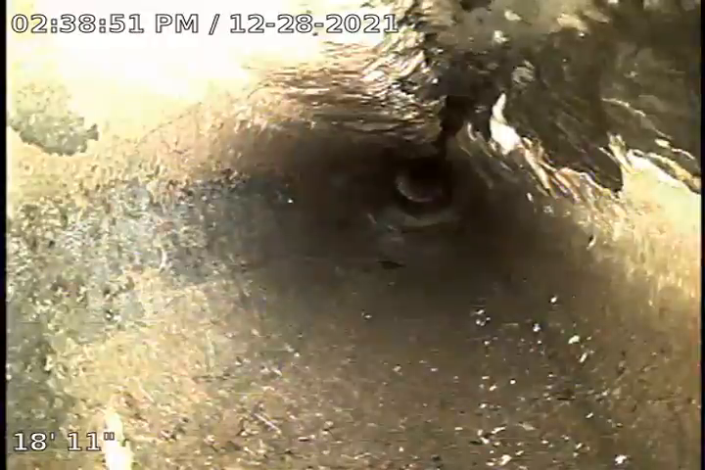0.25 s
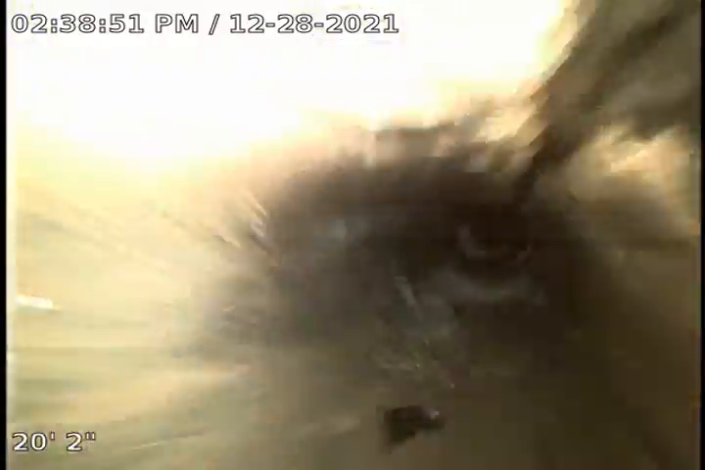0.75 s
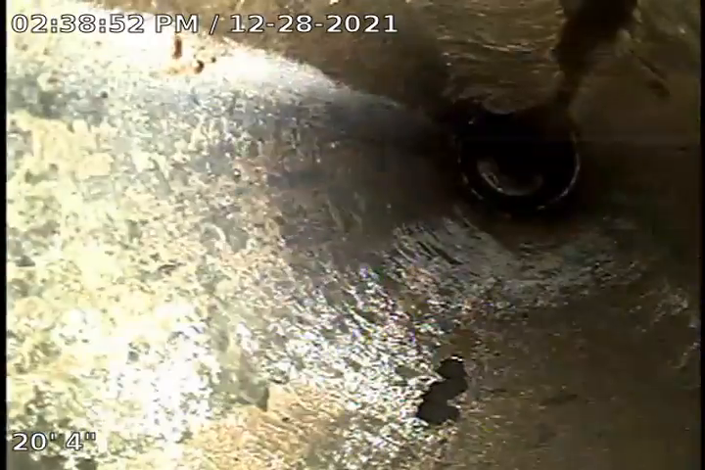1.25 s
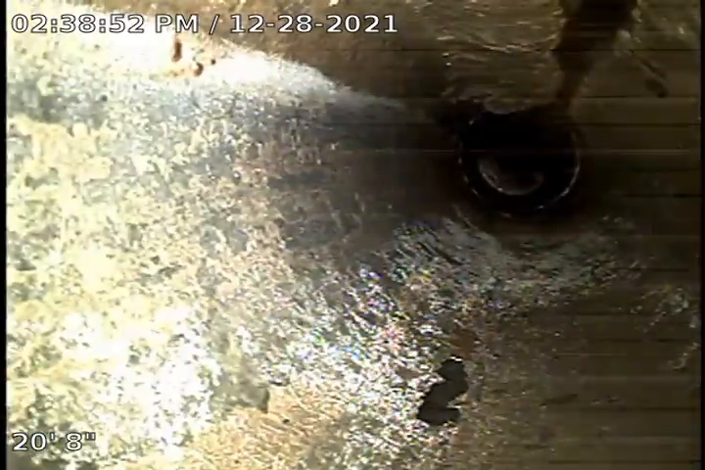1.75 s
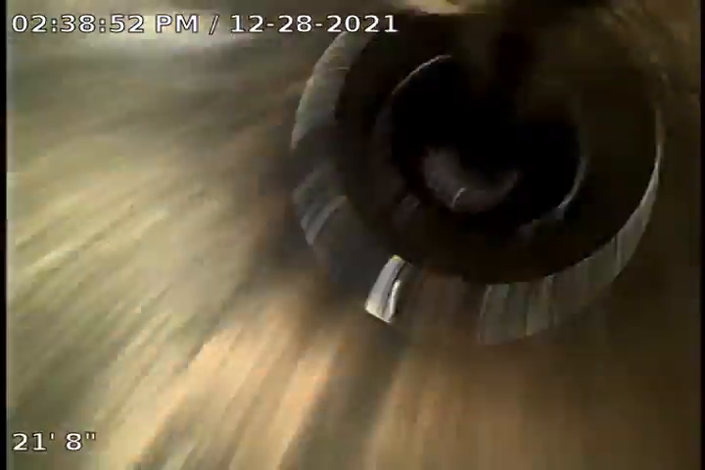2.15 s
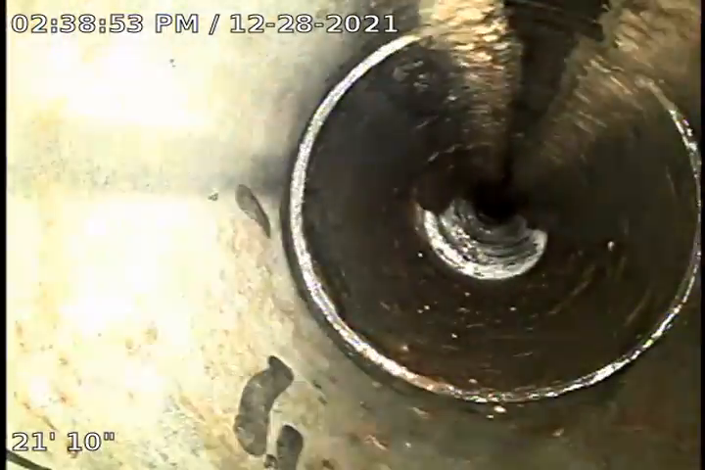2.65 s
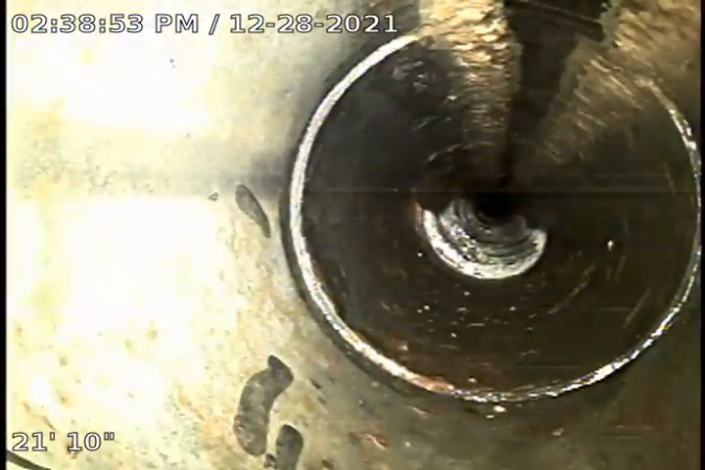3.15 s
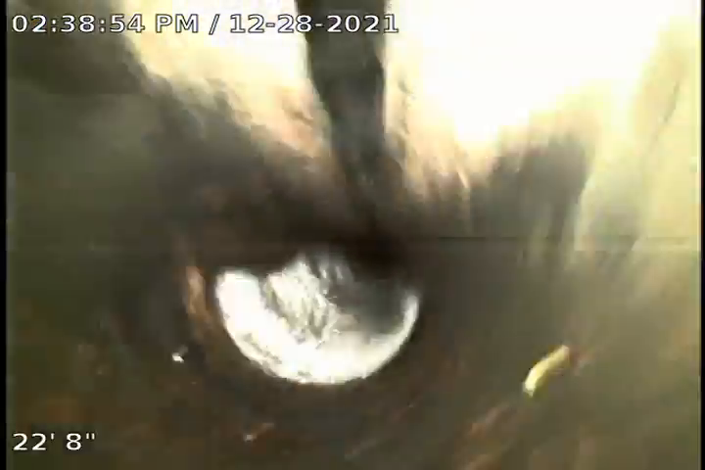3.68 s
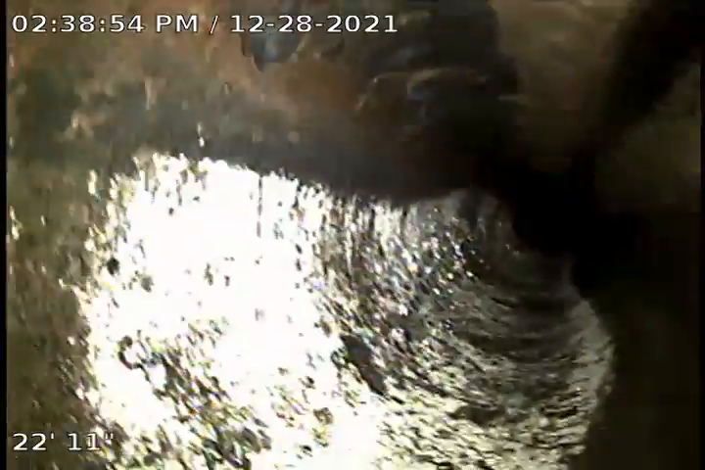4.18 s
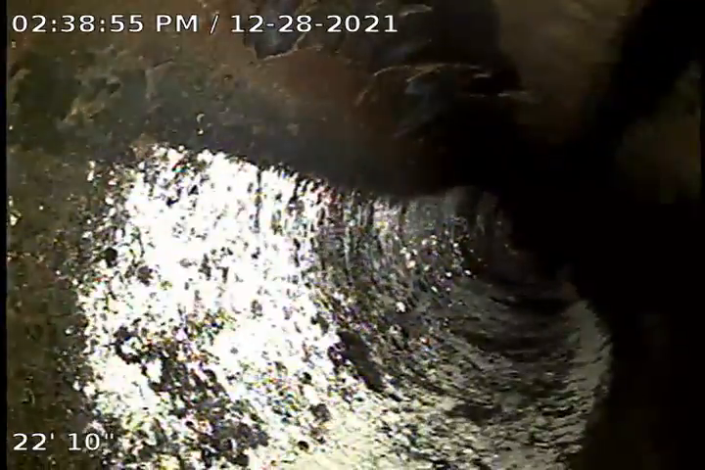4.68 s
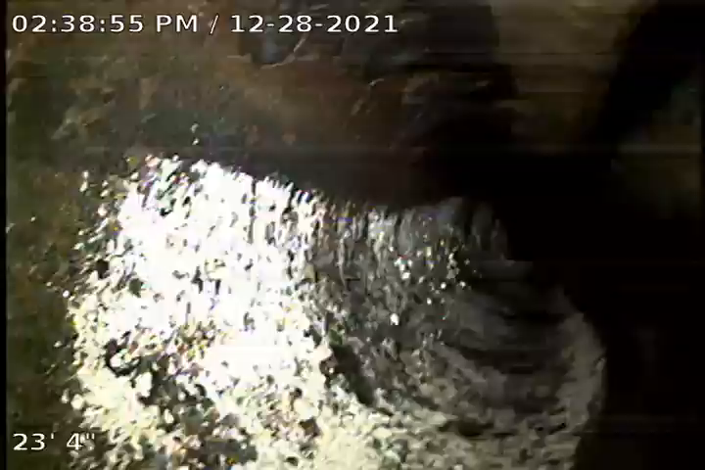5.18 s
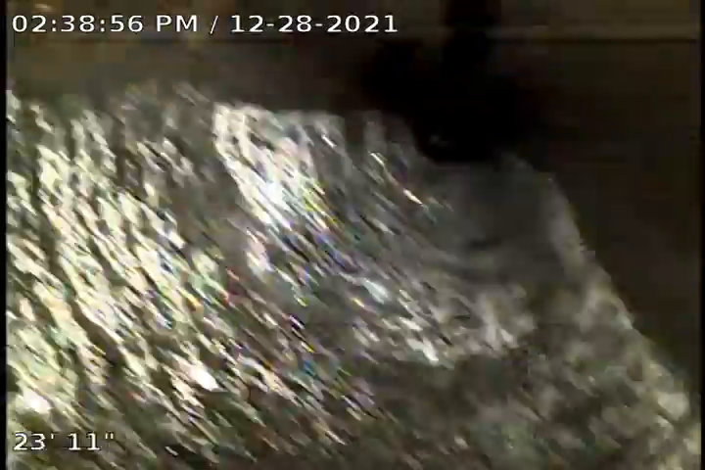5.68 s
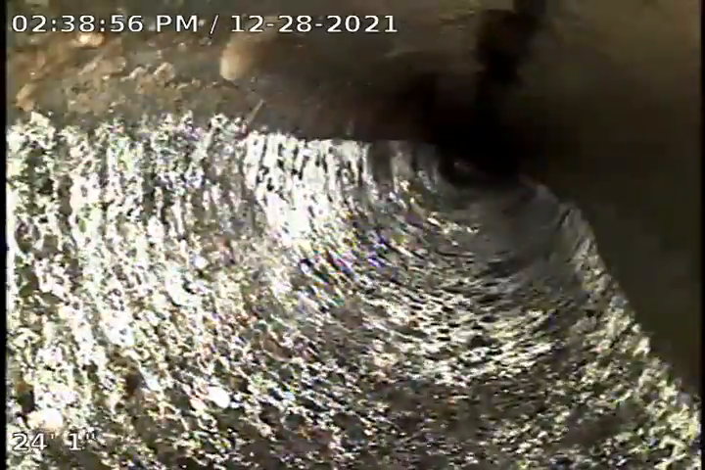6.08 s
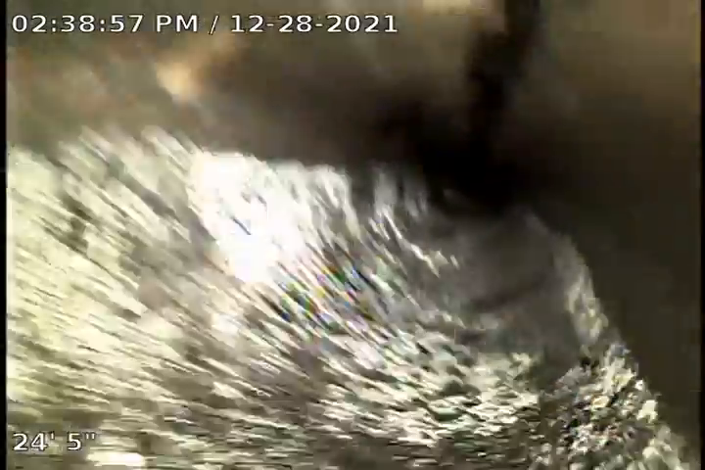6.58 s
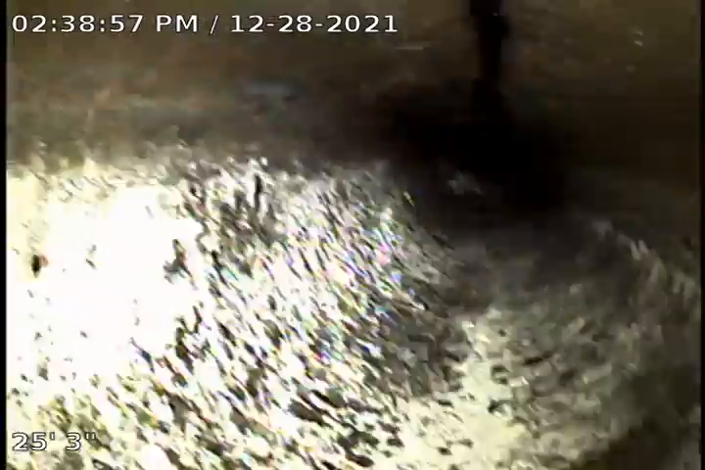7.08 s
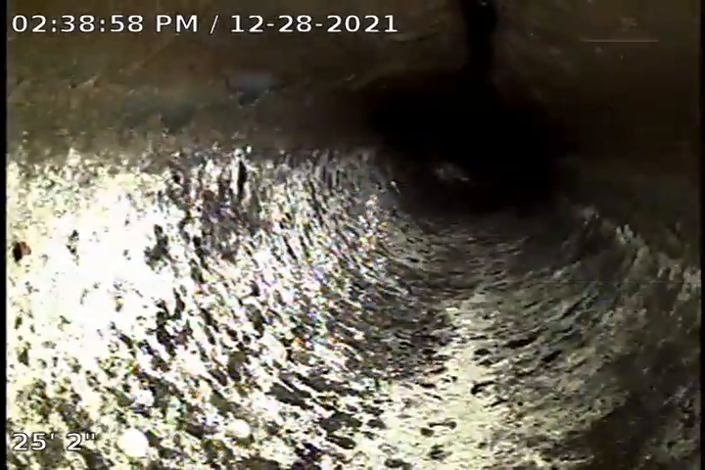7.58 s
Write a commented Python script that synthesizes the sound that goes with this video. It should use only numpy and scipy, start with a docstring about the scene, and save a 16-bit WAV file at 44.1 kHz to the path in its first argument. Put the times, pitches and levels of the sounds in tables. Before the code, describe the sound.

Close, dry scraping of a push cable in rough strokes, broken by boxy thuds, clattering and hard clicks, ending in a thin airy whistle.

```python
"""Gritty strokes of a stiff push cable fed into a drain pipe, with a dry rustle between them, knocks, rattles and clicks.
Heard by one close microphone at the reel. Noise made of clumped slips scrapes through the cable's resonances;
the same kind of noise shakes the hollow frame; short blows ring cable and frame; hard contacts ring the guide.
Near the end the cable whistles thinly over a sharp edge. A low hum and an electrical offset sit under everything.
"""
import sys
import numpy as np
from scipy import signal
from scipy.fft import rfft, irfft, next_fast_len
from scipy.io import wavfile
from scipy.ndimage import uniform_filter1d, map_coordinates

SR = 44100
rng = np.random.default_rng(int(sys.argv[2]) if len(sys.argv) > 2 else 0)


def master(y):
    """Save y as 16-bit WAV."""
    cut = np.clip(np.atleast_2d(y).T, -1, 1)
    pcm = np.round(cut * 32767)  # scale
    wavfile.write(sys.argv[1], SR, pcm.astype(np.int16))


N = 345303  # samples

# pushes of the cable, firm in its guide, one list a push:
# (time [s], scrape [dB], bright friction [dB], fine hiss [dB])
PUSHES = [
    [(0.27, -44, -46, -49), (0.34, -38, -39, -44), (0.464, -36.5, -33, -32.5), (0.57, -30, -29, -34),
     (0.644, -31.5, -28.5, -29.5), (0.698, -29.5, -31.5, -32), (0.768, -29.5, -25, -30),
     (0.848, -33.5, -33.5, -40), (0.904, -44, -45, -47), (0.97, -47, -62, -64)],
    [(1.68, -53, -55, -53), (1.748, -31, -37, -41), (1.796, -32, -31.5, -29), (1.87, -34.5, -33, -37),
     (1.926, -30, -30.5, -36), (2.034, -33.5, -30, -35), (2.126, -29.5, -29, -36), (2.174, -32, -30, -33),
     (2.278, -36, -32.5, -41), (2.34, -41.5, -49, -46)],
    [(3.24, -42, -44.5, -55), (3.382, -28, -33, -35), (3.502, -39, -33, -47), (3.578, -33.5, -28.5, -38),
     (3.728, -31.5, -30, -42), (3.79, -35, -33.5, -35.5), (3.942, -38.5, -39, -48), (4.05, -57, -52, -59)],
    [(5.064, -38, -45, -58), (5.12, -33.5, -36.5, -41), (5.164, -30, -31, -38), (5.244, -33, -30.5, -33),
     (5.298, -36.5, -30, -32.5), (5.408, -26.5, -26.5, -35.5), (5.46, -28, -27.5, -36),
     (5.542, -29, -33.5, -32), (5.588, -31.5, -33, -46), (5.7, -60, -55, -55)],
    [(6.38, -41, -48, -60), (6.438, -38.5, -43, -44), (6.494, -29, -33, -33.5), (6.604, -27, -29.5, -31),
     (6.646, -29, -29.5, -38), (6.724, -29, -25, -35), (6.802, -30, -27.5, -35.5),
     (6.92, -33, -33.5, -38.5), (7.03, -48.5, -44, -46)],
]
# lighter rubbing between pushes:
# (start [s], rise [s], hold [s], fall [s], scrape [dB], bright friction [dB], fine hiss [dB])
RUBS = [(-.02, 0.018, 0.046, 0.17, -47, -41, -44.5), (0.852, 0.052, 0.035, 0.016, -38.5, -39, -56),
        (1.003, 0.1, 0.033, 0.084, -43.5, -44, -44.5), (1.157, 0.09, 0.19, 0.1, -52, -37, -41),
        (1.392, 0.011, 0.003, 0.044, -32, -21, -26.5), (1.427, .03, 0.037, 0.18, -43, -48, -44),
        (2.31, 0.053, 0.27, 0.13, -46, -43.5, -44), (2.667, 0.027, 0.34, 0.086, -41.5, -45, -67),
        (3.131, 0.026, 0.0073, 0.047, -45, -39, -30.5), (4.053, 0.11, .01, 0.1, -46, -51, -66),
        (4.313, 0.434, 0.16, 0.071, -52, -44, -45.5), (5.687, 0.38, 0.04, 0.21, -38.5, -38, -41),
        (6.995, 0.069, .03, .05, -45, -41, -47), (7.041, 0.047, 0.1, 0.56, -60, -37, -39),
        (7.673, 0.091, .2, 0.12, -44.5, -43, -39)]
# bouts of shaking of the frame: (start [s], rise [s], hold [s], fall [s], rumble [dB], rattle [dB])
SHAKES = [(-.02, 0.014, 0.0048, 0.048, -22.5, -30), (0.023, 0.033, 0.068, 0.085, -34, -37),
          (0.221, 0.057, .01, 0.08, -36, -35), (0.758, 0.019, .01, 0.083, -28.5, -26),
          (1.14, 0.081, 0.1, 0.11, -43, -44.5), (1.377, 0.023, 0.022, 0.1, -29, -28.5),
          (1.444, 0.032, 0.019, 0.24, -34, -40.5), (1.685, 0.039, .01, 0.039, -33, -29),
          (2.298, 0.13, .01, 0.13, -36, -39.5), (2.656, 0.039, 0.12, 0.035, -28.5, -35.5),
          (2.816, 0.047, 0.16, 0.079, -27, -32), (3.056, 0.028, 0.033, 0.033, -31.5, -41),
          (3.187, 0.032, .01, 0.084, -26.5, -36), (3.467, 0.088, .01, 0.08, -34, -37.5),
          (4.462, 0.092, .02, 0.12, -39.5, -47.5), (4.663, 0.027, 0.17, .05, -36, -45),
          (4.801, 0.047, .01, 0.14, -28, -34), (5.208, 0.12, .01, 0.047, -35, -38),
          (5.716, 0.12, 0.098, .1, -40, -45.5), (5.95, 0.072, 0.028, 0.06, -29.5, -33),
          (6.085, 0.029, 0.054, 0.26, -32, -33.5), (6.575, 0.046, .01, 0.05, -28, -36),
          (6.734, 0.028, 0.01, 0.074, -26, -29), (6.947, 0.037, 0.25, 0.16, -43, -52)]
# hand at rest: (scrape [dB], bright friction [dB], hiss [dB], rumble [dB], rattle [dB])
REST_DB = (-53, -52.5, -53.5, -52, -55)
# rattle of the boards at the start of each push: one level a push [dB re scrape]
RATTLE_START_DB = (-11.5, -10, -10.5, -14, -13)
RUMBLE_DB = -12.5  # shaking of the frame in a push, re scrape
RATTLE_GROWS_DB_PER_S = 11.5
RISE_BEND, FALL_BEND = 0.89, 0.98  # 1 = straight ramps in amplitude
STEP_S = .002  # the hand's movements are followed in steps of this length
UNEVEN_DB, HISS_UNEVEN_DB, UNEVEN_RATE = 1.8, 2.4, 15  # unsteady hand: spreads [dB], knots a second
RUB_EVEN = 0.45  # outside the pushes the hand shows this share of the unsteadiness

# lower and upper cable modes: (frequency [Hz], width [Hz], level [dB])
LOWER_MODES = [(1230, 90, -11), (1670, 110, 0), (2220, 130, -4), (2670, 150, 1)]
UPPER_MODES = [(4020, 110, 2), (4450, 350, -4), (6010, 200, -8), (7450, 330, -11), (8050, 220, -14)]
# grit heard between the lower and the upper modes: (frequency [Hz], relative level [dB per Hz])
LOWER_BED = [(600, -51), (1000, -28.5), (1600, -8.5), (2600, -8), (3300, -13.5), (4500, -25.5)]
UPPER_BED = [(2200, -11.5), (3000, -8), (3500, -9), (4300, -5.5), (5400, -11), (6900, -18.5), (9000, -48),
             (12000, -33), (16000, -32)]
# dry rustle and finest slips: (frequency [Hz], relative level [dB per Hz])
RUSTLE = [(1200, -40), (2000, -20), (2700, -3), (3250, 4), (3900, 2), (4600, 4), (5600, -2.5), (8300, -18),
          (9500, -56), (12000, -26), (16000, -33)]
HISS = [(5000, -1), (8000, 0), (9000, -2.5), (11000, -2), (13000, -2.5), (14500, 2.5), (15300, 10.5),
        (16500, -23)]
PATCH_DB, PATCH_RATE = 2.7, 22  # modes come and go as the contact point shifts: [dB], knots a second

# hollow frame, its panel, cover and lid: (frequency [Hz], width [Hz], level [dB])
HOLLOW = [(178, 142, -11), (269.5, 52, 2.5), (347, 114, -13)]
PANEL = [(449.6, 41, -0.5), (544, 62, -0.5)]
COVER = [(690, 69, -2.5), (787.6, 32.5, 3.5), (881, 130, -5.5)]
LID = [(968, 146, -8), (1269, 78, 2), (2130, 520, -14.5), (3330, 960, -19)]
STIFF_HZ = 160  # the frame fades out below this

# low hum: (frequency [Hz], relative level [dB per Hz])
HUM = [(15, -22), (35, -22), (55, -16), (68, -7), (75, 0), (83, -7), (100, -15), (160, -15), (220, -24),
       (400, -60)]
# level points of the low noise: (time [s], level [dB])
HUM_DB = [(0.0, -43), (0.11, -52), (0.28, -47), (0.44, -67), (0.91, -49.5), (1.74, -45.5), (1.79, -60),
          (2.33, -47.5), (5.91, -53.5), (6.19, -42), (6.56, -56), (7.02, -45), (7.83, -53)]

# knocks: (time [s], click peak [dB], thud [dB re click], thud pitch [Hz], panel [dB re click],
#          cover [dB re click], lid [dB re click], treble tick [dB re click], contact t60 [s])
KNOCKS = [(0.1024, -38.5, 17.5, 277, -15, -18, -9, -9, 0.028),
          (0.247, -48, 14, 287, 13, 9.6, -1, -7, 0.043), (0.7775, -26.5, -8, 285, 2.9, 13, -8, -15, 0.054),
          (0.784, -8, 2.5, 283, -9, -2, -2.5, -4, 0.04),
          (0.802, -15.5, -10, 307, -20, -13, -13, -20, 0.033),
          (0.853, -32.5, -1, 253, -13, 9.5, -5, -15, 0.037),
          (1.081, -25.5, -30, 248, -14, -3, -2, -20, 0.018),
          (1.3921, -18, -4, 275, 2.5, 3.5, -10, -18, 0.097), (1.4035, -20, -10, 258, -8, -8, -12, 3, 0.048),
          (1.4071, -8, 2.5, 270, -2.2, -1.4, -11, 1, 0.033), (1.417, -16.5, 4, 277, 5, 4.6, -5, -14, 0.04),
          (1.4249, -20.5, 11.5, 255, 3.2, 4.5, 6, -18, 0.07),
          (1.444, -27.5, 13, 251, -2, 0, -5, -20, 0.028), (1.473, -34, 9, 266, 0.1, 9, -5, -20, 0.049),
          (1.747, -24.5, 7.5, 276, 1.5, -4.5, -11, -17, 0.03),
          (2.0557, -25, 4, 258, -27.1, -29.1, -25, -16, 0.049),
          (2.2088, -22, -12, 231, -17, 2.5, -17, -14, 0.053), (2.686, -31, 6, 269, 3, 1, -3, -23, 0.056),
          (2.7051, -19, -4, 278, 0.4, -8.0, -2, -26, 0.12),
          (2.7161, -18.5, -6, 269, -1.5, -2, 4.5, -32, 0.11),
          (2.748, -17.5, 0, 285, -10, -10.8, -4, -29, 0.032),
          (2.782, -14.5, 1.5, 287, -15, -1, -5, -30, 0.035), (2.789, -12, 3, 290, -8, -8, 1, -34, 0.044),
          (2.848, -17, 5.5, 282, -7, -4, -2.5, -33, 0.066), (2.8891, -28, 15, 307, 6.4, 1, 6, -24, 0.045),
          (2.9714, -10.5, -8, 293, -12, -6, 3, -31, 0.057), (2.978, -20, -3, 264, -8.6, -3, -1, -33, 0.054),
          (2.987, -12.5, -5, 262, -10, -19, -9, -37, 0.064),
          (3.005, -24.5, 13, 300, -6, -2, -12, -30, 0.077), (3.0275, -26, 4, 258, 1, 4, 1, -29, 0.11),
          (3.0994, -32, 5, 255, 2.3, 3.5, 5.5, -17, 0.02), (3.198, -23, -10, 285, -8, -4.2, -4, -30, 0.057),
          (3.217, -18.5, -17, 301, -3, 0.5, -12, -33, 0.048),
          (3.2275, -11, 0, 269, -14, -9, -9, -32, 0.023),
          (3.235, -23.5, 5.5, 263, -13.0, -4, 4, -34, 0.028),
          (3.9444, -31.5, 0, 278, -16, 4, -6, -14, 0.074), (4.15, -30, -19, 253, -16, -15, -1, -24, 0.036),
          (4.4752, -48.5, 20.5, 264, 7, -14.0, -15, -7, 0.03),
          (4.5687, -37, 7.5, 258, -14.6, -14.3, -17, -10, 0.051),
          (4.6762, -40.5, 5, 291, 14, 3, 0, -6, 0.0064), (4.8402, -22.5, 7.5, 296, 1.0, 5, 2, -14, 0.089),
          (5.7868, -33.5, 5, 226, -8, -4, 0, -9, 0.025), (5.8365, -24.5, -15, 280, -13, -0.5, 2, -33, 0.02),
          (5.9833, -21, 1, 264, -5, -4.7, -6, -17, 0.13), (6.0971, -23, 0, 290, 4, -1, -3, -15, 0.02),
          (6.101, -21, -8, 304, -2, -11, -0.5, -15, 0.079),
          (6.141, -27.5, 9.5, 269, 6.5, 4, -7, -18, 0.051), (6.156, -22, 3, 298, -4, -8, -6, -21, 0.088),
          (6.2725, -26.5, -17, 253, 0, -3.8, 4, -26, 0.024),
          (6.5876, -24, -1, 248, -0.5, -5, -23, -2, 0.03), (6.597, -37, 10, 250, 8, 0.7, -10, -15, 0.03),
          (6.628, -35, 12, 280, 4.7, 11, -10, -15, 0.04),
          (6.659, -18, -24, 215, -29.7, -23, -21, -15, 0.027),
          (6.7375, -10.5, -25, 250, -16, -3.5, -12, -7, 0.036),
          (6.746, -30, 16.5, 255, 10.5, 4, -8, -15, 0.05), (6.8248, -18, -23, 231, -20, 2, -6, -16, 0.12),
          (6.853, -31, -8, 248, -9, 11, -5, -15, 0.059),
          (6.875, -18.5, -32, 258, -20, -5, -0.5, -24, 0.043),
          (6.9424, -22.5, -4, 213, -6.5, 1, -3.5, -15, 0.096),
          (7.078, -27.5, -21.5, 291, -18.2, -19.7, -6, 7, 0.023),
          (7.1497, -24, -11, 240, -30.0, -26, -1, -13, 0.012),
          (7.3225, -32.5, -5, 305, -20, -38.0, -3, 6, 0.04),
          (7.585, -31, -14, 345, -23.6, -14, -12, 5, 0.018),
          (7.764, -30, -16, 332, -19, -36.0, -8, 9.5, 0.013)]
# cable slapping the frame, lower and upper modes: (frequency [Hz], width [Hz], level [dB])
SLAP = [(1680, 380, -4.5), (2100, 103, 1), (2323, 114, -2), (2960, 420, -6.5), (3290, 280, -4.5)]
SNAP = [(3510, 330, 0), (4570, 670, 2), (4700, 800, 1), (5700, 2700, -16.5)]
# upper modes re click; above the knee each dB of treble tick adds SNAP_FOLLOWS dB
SNAP_DB, SNAP_FOLLOWS, SNAP_KNEE_DB = -8, 0.79, -6
THUD_CHATTER_DB, BOARD_CHATTER_DB = -16, -7.5  # chatter felt by the low modes and by the boards
SWELL_S = 0.0045  # time constant with which the frame takes up a blow

# clicks of the cable against its guide: (time [s], peak [dB], contact time to peak force [s])
CLICKS = [(0.2866, 1.5, 0.000046), (1.6992, -3.5, 0.000066), (2.346, -3, 0.000054), (4.188, -17, 0.00019),
          (5.064, -13.5, 0.00024), (5.5855, -3, 0.000078), (6.3822, -5, 0.000083), (7.6108, -19, 0.00023)]
# the guide: (frequency [Hz], width [Hz], level [dB])
GUIDE = [(552, 83, -9), (801, 43, 0), (1000, 210, -3.5), (1426, 96, -8), (1710, 110, 2.5), (2000, 75, 2),
         (2410, 56, 3), (2600, 130, 2), (2900, 310, 2), (3660, 74, -1), (4040, 420, -2), (4900, 200, -7),
         (5380, 150, -8), (6450, 600, -18)]
REBOUND_S, REBOUND_DB = .00147, -7.5  # second contact
BUZZ_DB, BUZZ_T60_S = -23, 0.067  # loose buzz

# cable sliding on a sharp edge: (frequency [Hz], width [Hz], level [dB])
WHISTLE = [(3300, 260, 3), (4120, 300, 0), (4500, 260, -1), (5930, 250, -6)]
# when it slides: (start [s], rise [s], hold [s], fall [s], level [dB])
SLIDE = (7.68, 0.03, 1, .1, -34)

# difference between the channels: (frequency [Hz], side level before a 5.5 dB cut [dB re mid])
UNSHARED = [(60, 5), (110, -47), (200, -70), (380, -22), (700, -29.5), (1290, -36.5), (2380, -42.5),
            (4400, -28.5), (8120, -19), (15000, -15)]
# zero offset of the converter: (left [full scale], right [full scale])
OFFSET = (.0153, .0098)
TOP_HZ = 15780  # upper band limit


def amp(db):
    """dB to gain."""
    return 10 ** (np.asarray(db) / 20)


def unit(x):
    """Scaled to rms 1."""
    return x / np.sqrt(np.mean(x ** 2) + 1e-20)


def shape(points):
    """Gain over frequency from (Hz, dB) points on a log axis."""
    f, v = np.transpose(points)
    return lambda hz: amp(np.interp(np.log(hz + 1), np.log(f + 1), v))


def modes(table, spread=0):
    """Causal response of resonances with alternating signs, each moved in level by its own dB."""
    center, width, db = np.transpose(table)[..., None]
    sign = (-1.) ** np.arange(len(table))[:, None]
    gain = sign * amp(db + np.reshape(spread, (-1, 1)))

    def response(f):
        damping = 1j * f * width
        return np.sum(gain * damping / (center * center - f * f + damping), axis=0)

    return response


def filtered(x, response):
    """x times a response of frequency."""
    n = x.shape[-1]
    m = next_fast_len(n + 4096)  # padding for the ringing
    return irfft(rfft(x, m) * response(np.fft.rfftfreq(m, 1 / SR)), m)[..., :n]


def wobble(rate):
    """A smooth random curve, rate knots a second."""
    knots = rng.standard_normal(int(N * rate / SR) + 4)
    return map_coordinates(knots, [np.arange(N) * rate / SR])


def grit(grain_db, clump_db, clump_rate):
    """Dense slips: noise whose samples scatter in size and come in clumps."""
    grain = np.minimum(rng.exponential(size=N), 5)
    size = amp(grain_db * grain + clump_db * wobble(clump_rate))
    return size * rng.standard_normal(N)


def shifting(x, table):
    """x through resonances whose strengths wander, each on its own."""
    total = 0
    for k, row in enumerate(table):
        strength = amp(PATCH_DB * wobble(PATCH_RATE))
        total = total + (-1) ** k * strength * filtered(x, modes([row]))
    return unit(total)


def swell(t, start, rise, hold, fall):
    """Gain that ramps up to 1, holds and ramps down."""
    t = t - start
    up = np.clip(t / rise, 0, 1) ** RISE_BEND
    down = np.clip(1 - (t - rise - hold) / fall, 0, 1) ** FALL_BEND
    return up * down


def hand():
    """Gains of scrape, bright friction, hiss, rumble and rattle: powers of pushes, rubs, shakes and rest add."""
    t, sample_t = np.arange(0, N / SR + STEP_S, STEP_S), np.arange(N) / SR
    power = np.zeros((len(REST_DB), len(t)))
    for rows, start_db in zip(PUSHES, RATTLE_START_DB):
        s, *columns = np.transpose(rows)
        scrape_db, bright_db, hiss_db = [np.interp(t, s, c, -120, -120) for c in columns]
        growth_db = RATTLE_GROWS_DB_PER_S * np.clip(t - s[0], 0, s[-1] - s[0])
        rattle_db = scrape_db + start_db + growth_db
        power += amp([scrape_db, bright_db, hiss_db, scrape_db + RUMBLE_DB, rattle_db]) ** 2
    for *times, scrape_db, bright_db, hiss_db in RUBS:
        power[:3] += (amp([[scrape_db], [bright_db], [hiss_db]]) * swell(t, *times)) ** 2
    for *times, rumble_db, rattle_db in SHAKES:
        power[3:] += (amp([[rumble_db], [rattle_db]]) * swell(t, *times)) ** 2

    uneven_db = UNEVEN_DB * np.array([wobble(UNEVEN_RATE) for _ in REST_DB])
    uneven_db[2] *= HISS_UNEVEN_DB / UNEVEN_DB
    pushing = sum((t > rows[0][0]) & (t < rows[-1][0]) for rows in PUSHES)
    share = uniform_filter1d(np.where(pushing, 1, RUB_EVEN), size=25)
    uneven_db *= np.interp(sample_t, t, share)
    gains = np.sqrt(power + amp(REST_DB)[:, None] ** 2)
    return np.array([np.interp(sample_t, t, g) for g in gains]) * amp(uneven_db)


def sliding(scrape, bright, hiss):
    """Cable scraping through its resonances, a loose dry rustle and the finest slips."""
    slips = grit(grain_db=4.5, clump_db=3.0, clump_rate=110)
    loose = grit(grain_db=2.5, clump_db=0.9, clump_rate=50)
    low_bed = unit(filtered(loose, shape(LOWER_BED)))
    low = unit(shifting(slips, LOWER_MODES) + amp(-1) * low_bed)
    high_bed = unit(filtered(loose, shape(UPPER_BED)))
    high = unit(shifting(slips, UPPER_MODES) + amp(1) * high_bed)
    dry = unit(filtered(grit(grain_db=2.5, clump_db=0.85, clump_rate=85), shape(RUSTLE)))
    fine = unit(filtered(grit(grain_db=2.0, clump_db=1.26, clump_rate=100), shape(HISS)))
    # firm contact (a strong scrape) rings the upper modes; light contact only rustles
    firm = np.clip((20 * np.log10(scrape) + 44) / 9, 0, 1)
    friction = np.sqrt(firm) * high + np.sqrt(1 - firm) * dry
    return scrape * low + bright * friction + hiss * fine


def stiff(x):
    """The small frame radiates no deep bass: a high-pass."""
    return signal.sosfilt(signal.butter(3, STIFF_HZ, "high", fs=SR, output="sos"), x)


def frame(rumble, rattle):
    """The dragging cable shakes the hollow frame with small uneven bumps; cover and panel answer in patches."""
    bumps = grit(grain_db=4, clump_db=1.7, clump_rate=45)
    cover = shifting(bumps, COVER)
    panel = amp(-2.5) * shifting(bumps, PANEL)
    lid = amp(-7.5) * unit(filtered(bumps, modes(LID)))
    # the boards cancel between their modes
    valleys = shape([(300, -8), (450, 0), (620, -5), (790, 0), (1020, -9), (1275, 0)])
    boards = unit(filtered(cover + panel + lid, valleys))
    hollow = unit(stiff(filtered(bumps, modes(HOLLOW))))
    return rumble * hollow + rattle * boards


def hum():
    """A low hum: noise shaped to a narrow bass hump, at a drawn level."""
    level_db = np.interp(np.arange(N) / SR, *np.transpose(HUM_DB))
    return amp(level_db) * unit(filtered(rng.standard_normal(N), shape(HUM)))


def knocks():
    """Each contact is a blow and a short chatter that ring cable and frame at new strengths."""
    out, t = np.zeros(N + SR), np.arange(SR // 8) / SR
    blow = t / .0004 * np.exp(1 - t / .0004)  # a short push, felt mostly by the low modes
    # in order: slap, thud, panel, cover, lid, snap, treble tick
    chatter_db = (0, THUD_CHATTER_DB, BOARD_CHATTER_DB, BOARD_CHATTER_DB, BOARD_CHATTER_DB, 0, 0)
    for s, db, thud_db, thud_hz, *boards_db, tick_db, t60 in KNOCKS:
        decay = amp(-60 * t / max(t60, .003))
        chatter = rng.standard_normal(len(t)) * decay * (1 - np.exp(-t / 0.000076))
        hollow = np.array(HOLLOW) * [thud_hz / HOLLOW[1][0], 1, 1]  # the grip shifts the low modes
        bodies = (SLAP, hollow, PANEL, COVER, LID, SNAP)
        responses = [modes(body, rng.normal(0, 1.5, len(body))) for body in bodies]
        snap_db = SNAP_DB + SNAP_FOLLOWS * max(tick_db - SNAP_KNEE_DB, 0)
        levels = [0, thud_db, *boards_db, snap_db, tick_db]
        for loose_db, level, response in zip(chatter_db, levels, [*responses, shape(HISS)]):
            ring = filtered(0.59 * blow + amp(loose_db) * chatter, response)
            if loose_db:  # only the frame and its boards swell
                ring = ring * (1 - np.exp(-t / SWELL_S))
            out[round(s * SR):][:len(t)] += amp(db + level) * ring / np.abs(ring).max()
    return stiff(out[:N])


def clicks():
    """A hard contact and its rebound ring the same guide at slightly new strengths; soft contacts are duller."""
    out, t = np.zeros(N + SR), np.arange(SR // 10) / SR
    for s, db, contact in CLICKS:
        first = t / contact
        second = np.maximum(t - REBOUND_S, 0) / contact
        push = first * np.exp(1 - first) + amp(REBOUND_DB) * second * np.exp(1 - second)
        buzz = amp(BUZZ_DB - 60 * t / BUZZ_T60_S) * rng.standard_normal(len(t))
        ring = filtered(push + buzz, modes(GUIDE, rng.normal(0, 2.5, len(GUIDE))))
        out[round(s * SR):][:len(t)] += amp(db) * ring / np.abs(ring).max()
    return out[:N]


def edge():
    """A new stroke starts over a sharp edge: fine slips through wandering resonances, a thin airy whistle."""
    *times, db = SLIDE
    slips = grit(grain_db=1.0, clump_db=1.5, clump_rate=92)
    return amp(db) * swell(np.arange(N) / SR, *times) * shifting(slips, WHISTLE)


def scene():
    """One close microphone feeds both channels; a part with scrambled phases differs between them."""
    scrape, bright, hiss, rumble, rattle = hand()
    mid = sliding(scrape, bright, hiss) + frame(rumble, rattle) + hum() + knocks() + clicks() + edge()
    hz, _, z = signal.stft(mid, SR, nperseg=512)
    turned = z * np.exp(2j * np.pi * rng.random(z.shape)) * shape(UNSHARED)(hz)[:, None]
    side = amp(-5.5) * signal.istft(turned, SR, nperseg=512)[1][:N]
    return np.array([mid + side, mid - side])


def record(dry):
    """Soft clipping towards full scale, an offset that sags under loud treble, and the band limit."""
    x = dry / (1 + np.abs(dry) ** 8) ** (1 / 8)
    treble = filtered(x[0], lambda hz: hz > 11000)  # the left channel drives both sags
    power = uniform_filter1d(uniform_filter1d(treble ** 2, size=2000), size=2000)
    sag = np.reshape((16, 30), (2, 1)) * np.abs(power)
    x = x + np.reshape(OFFSET, (2, 1)) - sag
    return filtered(x, lambda hz: hz < TOP_HZ)


dry = scene()
out = record(dry)
master(out)
```